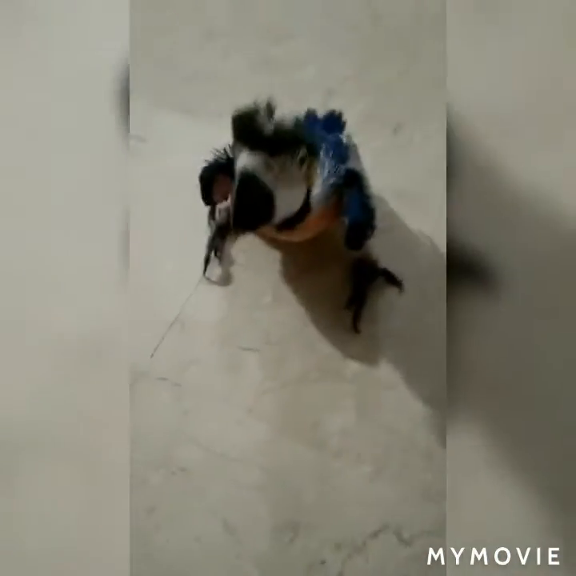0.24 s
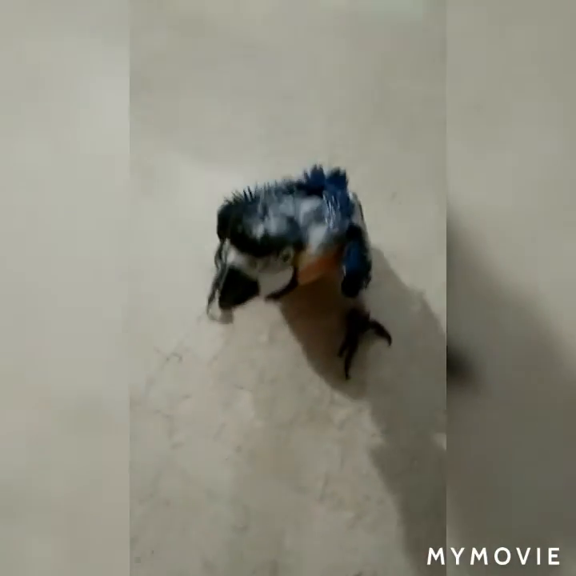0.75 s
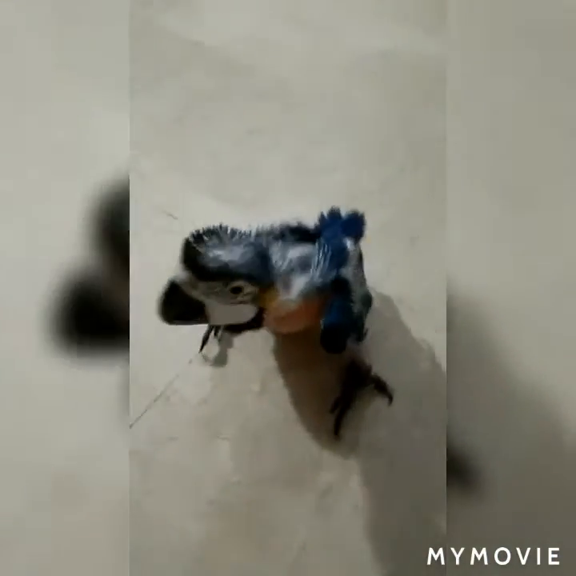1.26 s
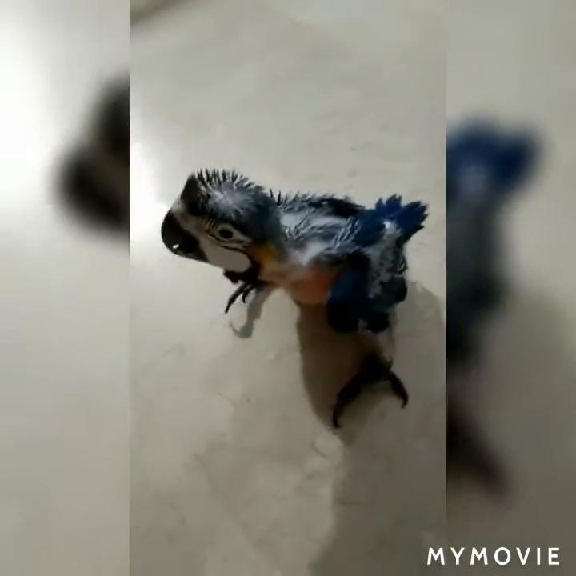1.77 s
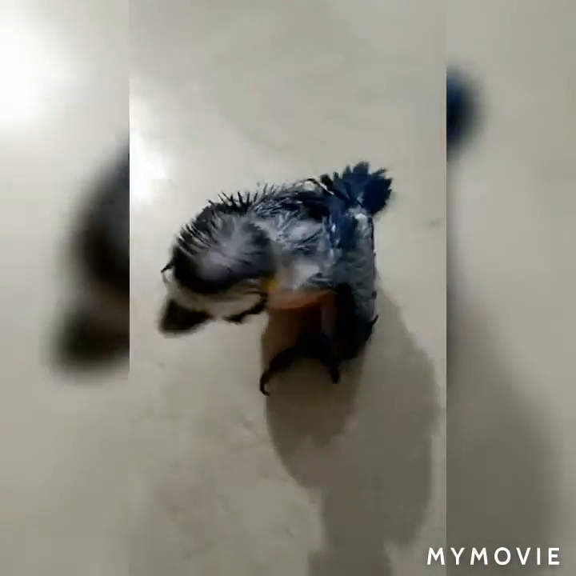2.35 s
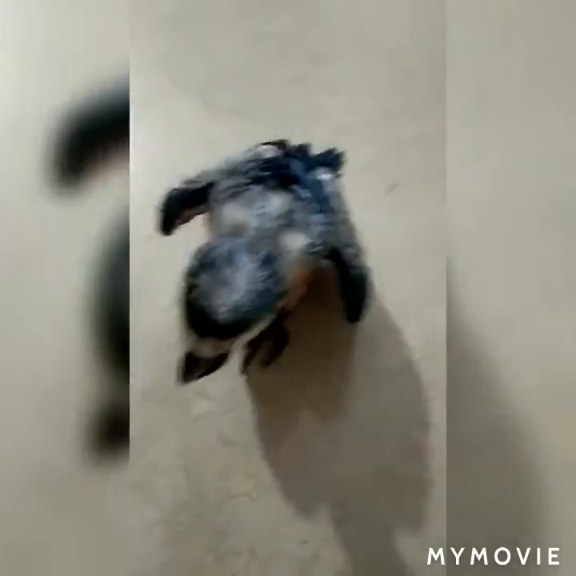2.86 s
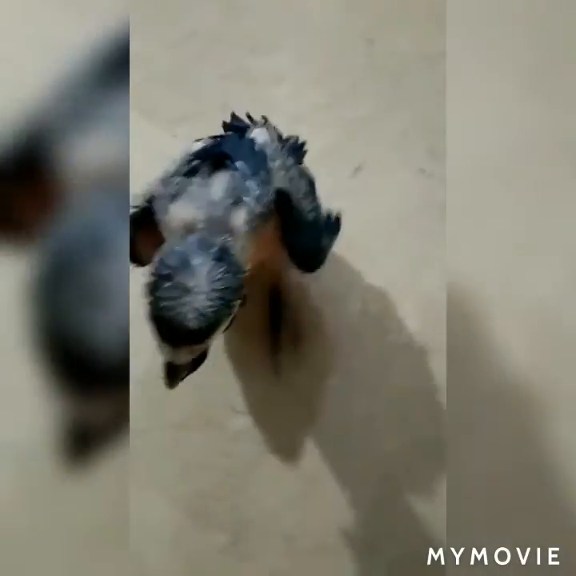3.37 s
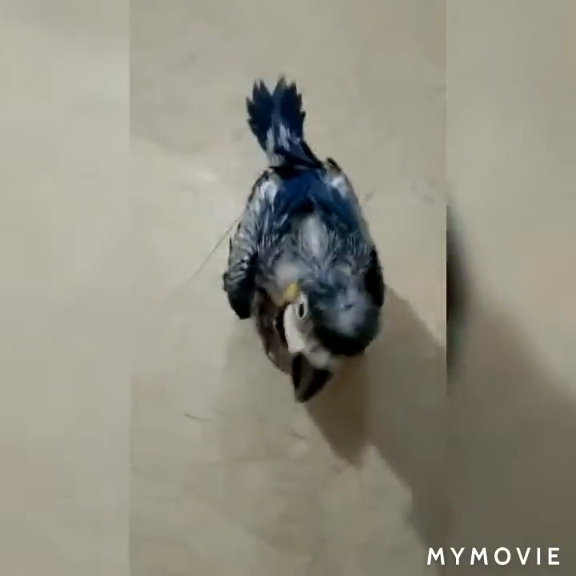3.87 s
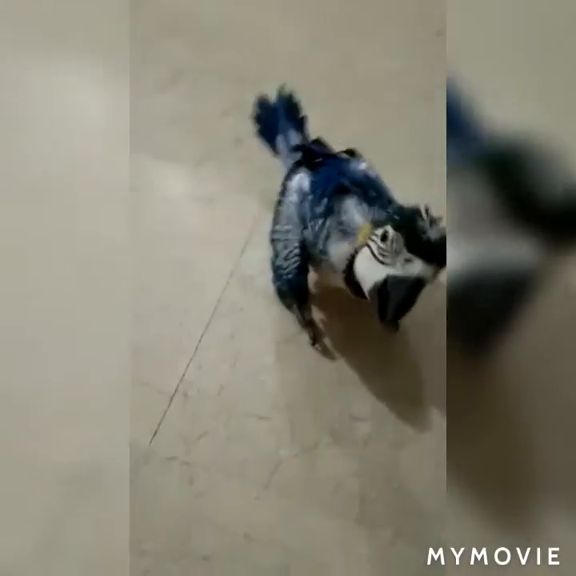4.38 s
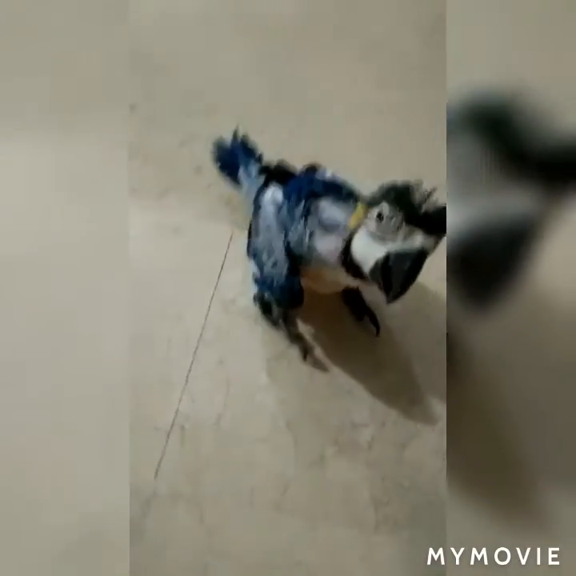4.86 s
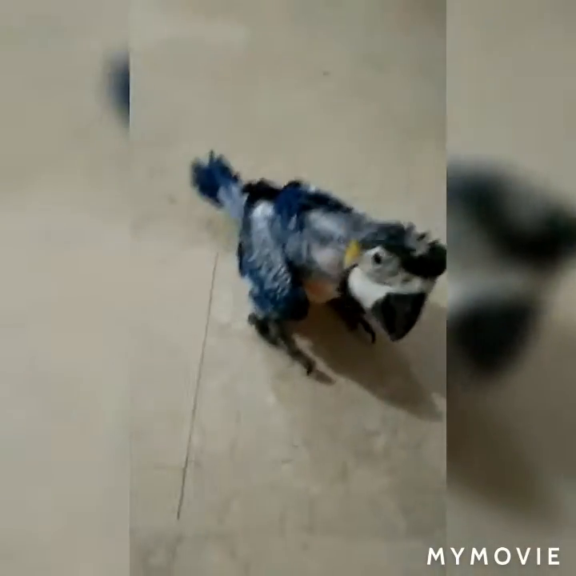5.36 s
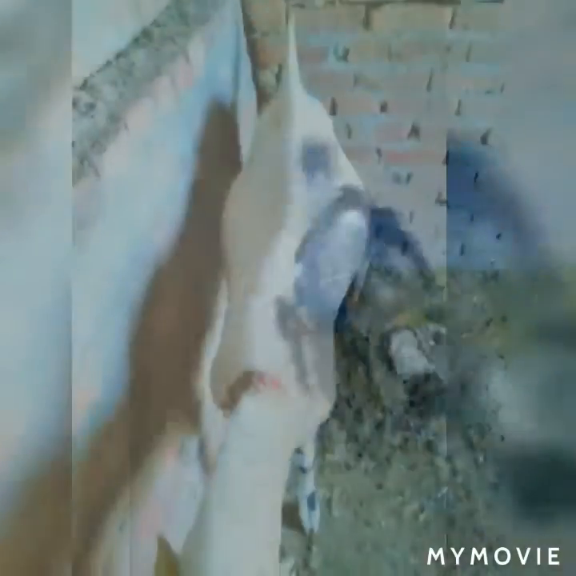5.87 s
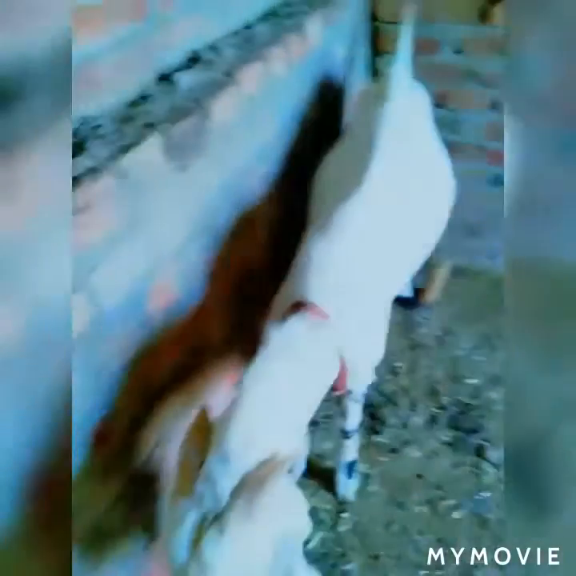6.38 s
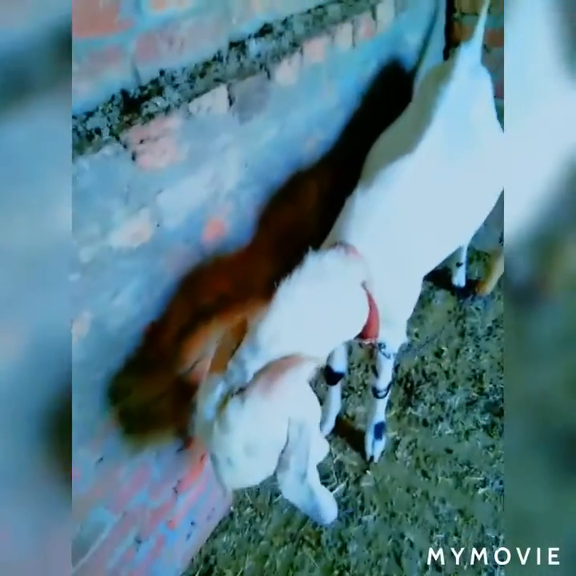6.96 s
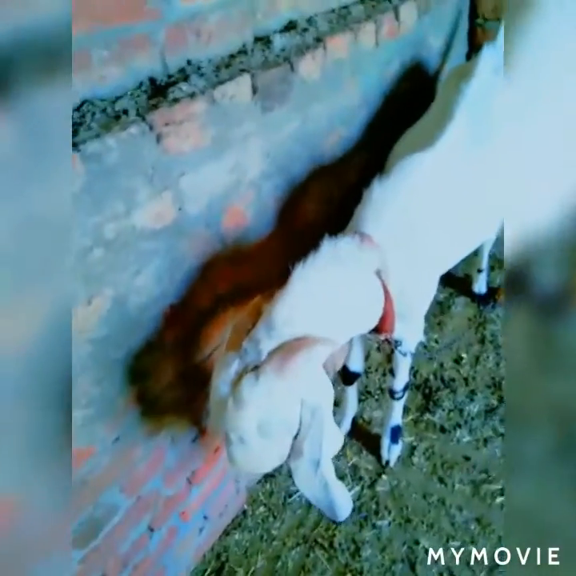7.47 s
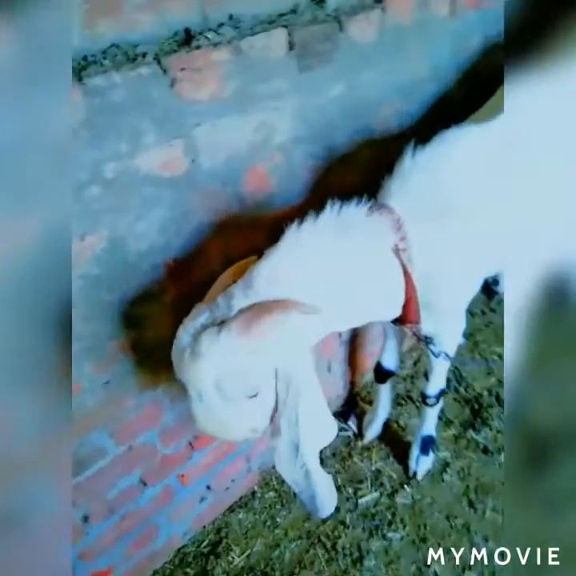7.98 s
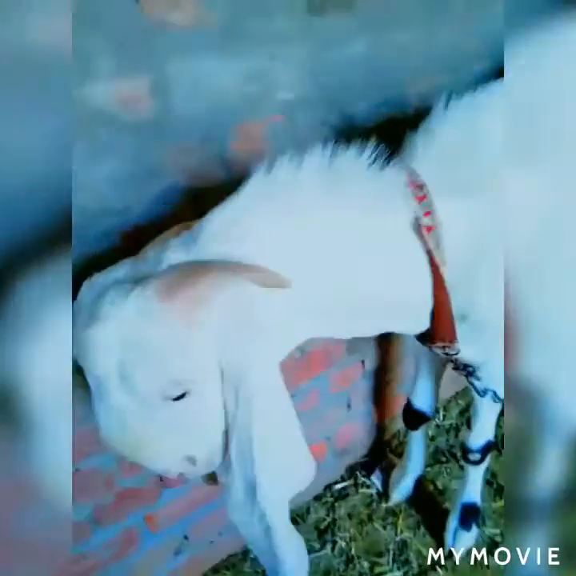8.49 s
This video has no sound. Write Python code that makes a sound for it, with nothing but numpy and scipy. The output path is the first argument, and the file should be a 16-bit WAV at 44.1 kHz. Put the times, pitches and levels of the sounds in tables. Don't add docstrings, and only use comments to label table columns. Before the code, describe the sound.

Mono phone sound in two parts. First, hard reverberant room: young parrots squawk in quick bursts, sliding whistles over low throaty grunts, with breathy hoarse moans and scattered sharp claw clicks, growing densest and loudest near the end. An abrupt tiny gap, then outdoors between walls: faint thin chirping, scratchy far bird calls, a few light straw ticks, and a soft distant traffic rumble.

```python
import sys
import numpy as np
from scipy import signal
from scipy.fft import rfft, irfft, next_fast_len
from scipy.io import wavfile
from scipy.ndimage import uniform_filter1d, minimum_filter1d

SR = 44100
rng = np.random.default_rng(int(sys.argv[2]) if len(sys.argv) > 2 else 0)


def digitize_waveform(pressure):
    field = np.atleast_2d(pressure).T
    bounded = np.clip(field, -1, 1)
    quanta = np.round(bounded * 32767).astype(np.int16)
    wavfile.write(sys.argv[1], SR, quanta)


def makeup_ratio(level_db):
    decades = np.asarray(level_db, float) / 20
    return 10 ** decades


N = 384993

ROOM_END, YARD_START = 5.575, 5.629

# t/s, level/dB
MURMUR_LEVEL = [(0, -55), (1.35, -62.5), (1.65, -67.5), (2.1, -58.5), (3.0, -60), (3.55, -57), (4.1, -50),
                (4.6, -61), (5.2, -56.5), (5.57, -60.5)]
# f/Hz, level/dB
MURMUR_TONE = [(25, -26.5), (60, -16), (120, -3.5), (1000, -14.5), (5500, -14), (7300, -20), (9000, -35),
               (15500, -51)]
# f/Hz, level/dB
FAN_HUM = [(361, -58), (120, -70)]
# f/Hz, t60/s
ROOM_DECAY = [(300, 0.36), (1200, 1.19), (2500, 1.25), (5000, 1.02), (8000, 0.62), (14000, 0.34)]
# f/Hz, level/dB
TILE_LOSS = [(1200, -1.35), (2500, -1.5), (4000, -1.5), (5500, -1), (10000, 1)]

# t/s, level/dB
TRAFFIC_LEVEL = [(5.63, -69), (5.8, -67), (5.97, -62), (6.2, -65.5), (7.0, -61.5), (8.73, -60.5)]
# f/Hz, level/dB
TRAFFIC_TONE = [(25, -39.5), (60, -4.5), (115, 2), (200, -9.5), (800, -17), (7000, -20), (8600, -39.5),
                (14000, -53)]
# f/Hz, t60/s
YARD_DECAY = [(1000, .4), (4000, 0.25), (9000, 0.087)]
# start t/s, end t/s, first f/Hz, last f/Hz, level/dB
ROUGH_SPARROWS = [(5.795, 6.001, 3470, 3520, -63), (6.053, 6.196, 3920, 3290, -63),
                  (6.064, 6.124, 3290, 3150, -61), (6.118, 6.255, 2740, 2630, -71),
                  (6.265, 6.327, 3920, 3880, -57), (5.847, 5.886, 3420, 3410, -49),
                  (6.276, 6.326, 3010, 2980, -68), (6.072, 6.135, 6500, 6100, -65),
                  (6.339, 6.392, 4560, 4460, -51.5), (6.454, 6.544, 3570, 3110, -57.5),
                  (6.592, 6.707, 3710, 3390, -60.5), (6.594, 6.652, 2780, 2780, -64),
                  (6.689, 6.764, 2560, 2440, -64), (6.794, 6.88, 3240, 2720, -63),
                  (6.896, 7.008, 3620, 3430, -59), (7.01, 7.096, 4330, 3730, -57.5),
                  (7.047, 7.096, 3180, 3070, -55), (7.179, 7.328, 3430, 3440, -57.5),
                  (7.26, 7.439, 2780, 3230, -59), (7.679, 7.765, 3380, 3320, -52.5),
                  (8.056, 8.09, 3500, 3350, -57), (8.12, 8.288, 3270, 3180, -61),
                  (8.479, 8.6, 2670, 2595, -65.5), (6.37, 6.432, 1470, 1300, -64)]
# start t/s, end t/s, f/Hz, tone level/dB, octave level/dB
CLEAR_SPARROWS = [(5.627, 5.821, 2730, -73, -68), (5.86, 5.961, 2820, -87, -57.5),
                  (6.144, 6.308, 2900, -71.5, -63.5), (6.305, 6.44, 2860, -76, -55),
                  (6.79, 6.87, 2870, -75, -54), (6.892, 7.004, 2775, -65, -56.5),
                  (7.125, 7.204, 2777, -81, -50), (7.397, 7.664, 2720, -65, -59),
                  (7.641, 7.71, 2825, -81, -52), (7.823, 8.05, 2770, -64.5, -61),
                  (8.073, 8.124, 2863, -52, -50), (8.079, 8.211, 2864, -77, -54.5),
                  (8.565, 8.724, 2825, -67.5, -55.5)]
# start t/s, end t/s, level/dB, treble tilt/dB
RASPS = [(5.831, 5.91, -61.5, 4.5), (5.96, 6.017, -62.5, 11), (6.327, 6.46, -62, 3.5),
         (6.47, 6.593, -67, -2.5), (6.771, 6.893, -57.5, 0), (6.939, 7.085, -62.5, 2),
         (7.18, 7.45, -69.5, -5), (7.394, 7.478, -67, 5.5), (7.47, 7.66, -70, 7), (7.94, 8.134, -68.5, 4),
         (8.133, 8.296, -73, -5.5), (6.048, 6.3, -74.5, -4.5), (6.592, 6.739, -69.5, -5),
         (7.661, 7.78, -59, 1.5), (7.819, 7.935, -63.5, -1.5), (8.02, 8.079, -58.5, 5),
         (8.47, 8.537, -71, 1), (8.53, 8.724, -68, 4.5)]
# f/Hz, level/dB
RASP_LOW_TONE = [(1800, -27), (2600, 2.5), (3400, 3), (4500, -1.5), (5200, -28)]
# f/Hz, level/dB
RASP_HIGH_TONE = [(4200, -22), (5000, -2), (6000, -3), (7300, -14), (8300, -19)]

# t/s, claw level/dB, knock level/dB, thud level/dB
STRAW_TICKS = [(5.7844, -58.5, -59, -61), (7.2664, -58, -48, -59), (7.2878, -48, -46, -56),
               (7.3544, -59, -41.5, -46), (7.6226, -47, -60, -75), (8.4736, -58, -50, -52)]
# t/s, claw level/dB, knock level/dB, thud level/dB
FLOOR_TICKS = [(0.5546, -18.5, -19, -31.5), (0.5677, -31.5, -9.5, -30), (0.7829, -25.5, -35, -34.5),
               (0.7943, -21, -34.5, -26.5), (2.885, -42, -37, -31.5), (0.9525, -37, -49, -43),
               (1.3021, -33, -45, -47), (2.6028, -27, -18, -27), (3.2571, -22.5, -20.5, -39),
               (3.4518, -24, -28, -51), (3.4575, -22.5, -30.5, -49.5), (3.5421, -32.5, -27, -48.5),
               (3.5495, -37, -42.5, -37), (3.6777, -24, -29, -42.5), (3.6812, -19.5, -18.5, -38),
               (3.6953, -28, -37, -62), (3.7696, -20, -24.5, -30.5), (3.8752, -15.5, -29.5, -26),
               (3.9904, -10.5, -10.5, -19.5), (4.2417, -28, -28, -71), (4.4244, -34.5, -26, -38.5),
               (4.4611, -37, -26.5, -39.5), (4.521, -22.5, -37, -55.5), (4.8684, -35, -34, -68.5),
               (4.9781, -34, -47, -65), (5.1339, -33.5, -28, -37), (5.3654, -19, -33, -38.5)]
# f/Hz, width/Hz, level/dB
CLAW_MODES = [(6100, 660, 13), (3600, 200, 4)]
# f/Hz, width/Hz, level/dB
KNOCK_MODES = [(2500, 270, 6), (1300, 730, -1.5)]
# f/Hz, width/Hz, level/dB
THUD_MODES = [(426, 120, 3.5), (242, 300, -9)]
# delay t/s, level/dB
BLOW_RETURNS = [(.0007, 4.76), (.0025, -4.5), (.0046, -9.5)]

# f/Hz, level/dB
MIC_TREBLE = [(7400, 0.5), (8400, -16), (10000, -22), (12500, -34.5), (14500, -29), (16000, -35)]
# f/Hz, level/dB
BREATH_TONE = [(250, -25), (900, -20), (1300, -2.5), (2400, 2.5), (3400, -3.5), (5200, -5.5), (7000, -13),
               (16000, 0)]
# t/s, level/dB
HISS_LEVEL = [(1.64, -81.5), (1.72, -56.5), (1.84, -56.5), (1.92, -73.5), (2.05, -95)]
# f/Hz, level/dB
HISS_COLOUR = [(7500, -40), (8500, -3), (11500, -7.5), (12300, -23.5), (13200, -0.5), (14200, 0),
               (15600, -6.5)]

# start t/s, end t/s, f/Hz, peak level/dB, air above the mic's edge level/dB
GRUNT_NOTES = [(0.055, 0.206, 611.1, -25.5, -5.5), (1.307, 1.371, 633, -23.5, -9),
               (2.629, 2.735, 610, -22, -2), (5.134, 5.24, 605.3, -25.5, 7.5)]
# f/Hz, level/dB
GRUNT_THROAT = [(500, -16.5), (1250, -4.5), (1800, -6), (2450, 3.5), (3200, -7.5), (4800, -4.5),
                (7300, -12), (16000, -21.5)]
# start t/s, end t/s, f/Hz, peak level/dB, air above the mic's edge level/dB
CAW_NOTES = [(0.191, 0.409, 726, -33.5, 7), (1.354, 1.47, 745, -29, -5.5), (2.714, 2.915, 751, -29, -3)]
# f/Hz, level/dB
CAW_FORMANTS = [(700, -14.5), (1500, -7), (2200, -1.5), (2980, 5), (3700, -4), (5000, 2.5), (7400, -7),
                (16000, -22.5)]
# t/s, f/Hz, level/dB
DRONE_PATHS = [
    [(1.64, 1113, -39.5), (1.7, 1112, -32.5), (1.75, 1000, -27.5), (1.78, 868, -32), (1.86, 848, -34),
     (1.89, 861, -37.5), (2.02, 867, -38.5)],
    [(2.0, 1255, -34), (2.3, 1243, -41.5), (2.56, 1180, -36)],
]
# f/Hz, level/dB
DRONE_FORMANTS = [(800, -9), (1200, -8.5), (1750, 5), (2300, 10.5), (3300, -4.5), (4400, -2.5), (6000, 1),
                  (7400, -12)]
DRONE_SCATTER = [2.6, 6]
DRONE_AIR_DB = [-2.5, -9]

# start t/s, end t/s, first f/Hz, last f/Hz, peak level/dB
FALLS = [(.39, .425, 2110, 1850, -12.5), (.425, .497, 2200, 1250, -24.5), (5.141, 5.19, 3260, 2900, -19),
         (1.575, 1.645, 2220, 1800, -20), (1.697, 1.775, 1880, 1470, -25.5),
         (2.92, 2.99, 2247, 1950, -12.5), (3.185, 3.225, 2550, 2300, -33), (4.05, 4.11, 2300, 1700, -17),
         (4.04, 4.15, 2622, 2667, -22.5), (5.257, 5.298, 2790, 2540, -18.5)]
SURGES = [(.19, .335, 2872, 2479, -23), (.345, .4, 2053, 2035, -13), (4.095, 4.168, 1845, 1704, -20),
          (5.18, 5.25, 2926, 2714, -16.5)]
REEDS = [(.325, .395, 2197, 1976, -9.5), (1.98, 2.24, 2222, 2034, -27.5)]
SQUEAKS = [(3.62, 3.67, 5640, 6100, -43.5)]
PIPES = [(1.42, 1.56, 3055, 2612, -20.5), (1.45, 1.62, 2802, 2277, -12)]
HELD = [(2.03, 2.2, 1909, 1813, -35.5), (2.28, 2.5, 1937, 1920, -29), (2.4, 2.5, 2010, 2043, -28),
        (3.015, 3.3, 2039, 1833, -18.5)]
GROANS = [(3.8, 4.0, 1826, 1333, -26)]
# notes, partial 1-4 level/dB, resting level/dB, pitch bend (under 1 drops early)
KINDS = [(FALLS, (0.5, -26, -28.5, -31), -27, 0.9), (SURGES, (-3, -15.5, -8, -15.5), -24, 0.77),
         (PIPES, (-10.5, -1, -47, -58.5), -32.5, 1), (HELD, (2, -8, -9.5, -36.5), -39, 0.41),
         (REEDS, (-3, -14, -0.5, -22.5), -32, 0.45), (GROANS, (-8.5, 1, -6, -2), -38.5, 0.8),
         (SQUEAKS, (0.1, -33), -40.5, 1.5)]
KIND_SCATTER = [.6, .7, .55, 1.7, .9, 5.4, 7]
KIND_SWELL = [False, True, False, False, False, True, True]
# t/s, f/Hz, level/dB
MOAN_PATH = [(4.24, 1620, -37), (4.29, 1795, -35.5), (4.34, 1718, -29), (4.399, 1525, -28.5),
             (4.47, 1401, -31), (4.6, 1249, -36)]
MOAN_PARTIALS = (-4.5, 4, -3.5, -7)
MOAN_SCATTER = 5.0
# t/s, f/Hz, level/dB, beak opening level/dB (frees the overtones)
SWOOP_PATHS = [
    [(.205, 3220, -28, 0), (.235, 3034, -17, -8), (.28, 2782, -20, -8), (.315, 2577, -17, -5.5),
     (.33, 2340, -18.5, -10.5)],
    [(2.8, 3100, -33, -8), (2.84, 2960, -23.5, -8), (2.88, 2717, -19, -1), (2.92, 2476, -16, -3),
     (3.01, 2242, -31.5, -4)],
    [(3.72, 1760, -33, -23), (3.75, 1848, -27, -0.9), (3.85, 1848, -24.5, -2), (3.92, 1856, -39, -0.8)],
    [(3.92, 2397, -39.5, 2.2), (3.96, 2580, -23.5, 0.8), (3.995, 2640, -21.5, -1), (4.015, 2536, -18, -6),
     (4.04, 2252, -11, -13.5)],
    [(4.106, 2304, -24, -7), (4.12, 2104, -25.5, 2.5), (4.14, 2008, -22, 1.2), (4.157, 1824, -25, -8),
     (4.18, 1520, -28, 2), (4.203, 1314, -29, -2)],
    [(5.226, 3217, -16.5, 3), (5.249, 2840, -10.5, -8.5), (5.257, 2592, -9.5, -18.5),
     (5.268, 2384, -11.5, 2.7), (5.3, 2054, -18.5, 1.5), (5.337, 1776, -25.5, -2.5), (5.36, 1586, -20, -25),
     (5.374, 1337, -25.5, 11.5), (5.445, 886, -36.5, -20)],
    [(5.366, 2822, -16.5, -20), (5.381, 2417, -11.5, -17.5), (5.41, 2290, -15.5, -2), (5.43, 2068, -21, 3),
     (5.447, 1787, -19, 2), (5.457, 1740, -26.5, -7.5), (5.492, 1340, -24.5, -13)],
]
SWOOP_PARTIALS = [(-3.5, 0.5, -37.5, -39), (-1.5, -11, -41, -59), (-3, -6.5, -8, -33.5), (1.5, 5, -21, -52),
                  (7.5, -22.5, -10.5, -17), (-5.5, -6.5, -20.5, -10), (-7, -6.5, -13.5, -17)]
SWOOP_SCATTER = [.5, .5, 2.4, .4, .4, .6, .7]
# f/Hz, level/dB
BEAK_TONE = [(3200, -8), (4000, 7), (4900, -8), (5500, 3), (6400, 2.5), (8000, -1.5)]


def unit(x):
    return x / np.sqrt(np.mean(x ** 2) + 1e-20)


def along(points, hz):
    f, v = np.transpose(points)
    return np.interp(np.log(hz + 1), np.log(f + 1), v)


def curve(rows):
    return np.interp(np.arange(N) / SR, *np.transpose(rows))


def wobble(rate, size):
    knots = rng.standard_normal(int(size * 600 / SR) + 4)
    place = np.arange(size) * min(rate, 600) / SR
    return np.interp(place, np.arange(len(knots)), knots) * 1.2


def filtered(x, response):
    m = next_fast_len(N + 8192)
    return irfft(rfft(x, m) * response(np.fft.rfftfreq(m, 1 / SR)), m)[:N]


def resonant(x, modes):
    def response(f):
        total = 0
        for k, (centre, width, db) in enumerate(modes):
            band = 1j * f * width
            total = total + (-1) ** k * makeup_ratio(db) * band / (centre * centre - f * f + band)
        return total
    return filtered(x, response)


def rush(spectrum, patchy_db):
    z = signal.stft(rng.standard_normal(N), nperseg=512)[2]
    field = uniform_filter1d(rng.standard_normal(z.shape), 6, 0)
    field = uniform_filter1d(field, 12, 1)
    noise = signal.istft(z * makeup_ratio(patchy_db * unit(field)), nperseg=512)[1][:N]
    return unit(filtered(noise, lambda f: makeup_ratio(along(spectrum, f))))


def echo(x, decays):
    hz, t, z = signal.stft(rng.standard_normal(int(1.5 * SR)), SR, nperseg=256)
    fall = makeup_ratio(-60 * t / along(decays, hz)[:, None])
    tail = signal.istft(z * fall, SR, nperseg=256)[1]
    delayed = np.pad(x, (200, 0))
    return signal.fftconvolve(delayed, tail / np.linalg.norm(tail))[:N]


def add_note(out, rows, scatter, partial_db, count, flutter_db, drift_db, fade):
    s, hz, db, *beak = np.transpose(rows)
    t = np.arange(s[0], s[-1], 1 / SR)
    pitch = np.interp(t, s, hz)
    unsteady = pitch * (1 + scatter / 100 * wobble(500, len(t)))
    phase = 2 * np.pi * np.cumsum(unsteady) / SR
    open_db = np.interp(t, s, beak[0]) if beak else 0
    tone = np.zeros(len(t))
    for k in range(1, count + 1):
        partial = k * pitch
        if partial.min() >= 15600:
            continue
        level = partial_db(k, partial) + along(MIC_TREBLE, partial)
        level = level + flutter_db * wobble(140, len(t))
        if k > 1:
            level = level + open_db + drift_db * wobble(20.7, len(t))
        tone += makeup_ratio(level) * (partial < 15600) * np.sin(k * phase + k * k)
    edge = np.clip(np.minimum(t - s[0], s[-1] - t) / fade, 0, 1)
    out[round(s[0] * SR):][:len(t)] += makeup_ratio(np.interp(t, s, db)) * edge * tone


def traffic():
    return makeup_ratio(curve(TRAFFIC_LEVEL) + 2) * rush(TRAFFIC_TONE, patchy_db=1.9)


def murmur():
    return makeup_ratio(curve(MURMUR_LEVEL) + 10) * rush(MURMUR_TONE, patchy_db=2.1)


def fan_hum():
    t = np.arange(N) / SR
    hum = np.zeros(N)
    for hz, db in FAN_HUM:
        level = makeup_ratio(db + 1.2 * wobble(2.3, N))
        hum += level * np.sin(2 * np.pi * hz * t + 1.3 * wobble(8.5, N))
    return hum


def sparrows():
    out = np.zeros(N)
    clear = [(start, end, hz * .985, hz * 1.01, 2.1, *db) for start, end, hz, *db in CLEAR_SPARROWS]
    rough = [(*note, 3.3, db, db - 28) for *note, db in ROUGH_SPARROWS]
    for start, end, first, last, scatter, *db in clear + rough:
        rows = [(start, first, .1), (end, last, -2.5)]
        add_note(out, rows, scatter, lambda k, hz: db[k - 1],
                 count=2, flutter_db=3.5, drift_db=2.0, fade=0.019)
    return out


def rasping_calls():
    t = np.arange(N) / SR
    effort = np.zeros((2, N))
    for start, end, db, tilt_db in RASPS:
        envelope = np.clip(np.minimum((t - start) / 0.027, (end - t) / 0.026), 0, 1)
        effort += makeup_ratio([[db - tilt_db], [db + tilt_db]]) * envelope
    low = effort[0] * rush(RASP_LOW_TONE, patchy_db=2.5)
    high = effort[1] * rush(RASP_HIGH_TONE, patchy_db=4.5)
    return makeup_ratio(3.9 * wobble(180, N)) * (low + high)


def ticks(rows):
    blows = np.zeros((3, N + 400))
    shape = makeup_ratio(-60 * np.arange(66) / SR / 0.00092)
    chance = rng.standard_normal((len(rows), 3, 66))
    for (s, *db), grits in zip(rows, chance):
        for (late, loss_db), grit in zip(BLOW_RETURNS, grits):
            force = makeup_ratio(np.array(db) + loss_db + [9, 7, 17])[:, None]
            blows[:, round((s + late) * SR):][:, :66] += force * shape * (1 + 0.3 * grit)
    claw = filtered(resonant(blows[0], CLAW_MODES), lambda hz: makeup_ratio(along(MIC_TREBLE, hz) * 0.42))
    return claw + resonant(blows[1], KNOCK_MODES) + resonant(blows[2], THUD_MODES)


def yard():
    birds = sparrows() + rasping_calls()
    birds = filtered(birds, lambda hz: 1 / (1 + (hz / 8200) ** 16))
    return makeup_ratio(0.5) * birds + makeup_ratio(-3) * echo(birds, YARD_DECAY) + ticks(STRAW_TICKS) + traffic()


def breath(calls):
    effort = np.sqrt(np.abs(uniform_filter1d(calls ** 2, 700)))
    effort = effort + makeup_ratio(-26.0 - 60 * np.arange(N) / SR / 2.0)
    air = filtered(rush(BREATH_TONE, patchy_db=5.5), lambda hz: makeup_ratio(along(MIC_TREBLE, hz)))
    return makeup_ratio(-8.0) * effort * air


def squawk_notes():
    notes = []
    for start, end, hz, db, air_db in GRUNT_NOTES:
        rows = [(start, hz * (1 - 0.028), db - 15), (end, hz, db)]
        notes.append((rows, 1.8, air_db, GRUNT_THROAT))
    for start, end, hz, db, air_db in CAW_NOTES:
        edge_hz = hz * (1 - 0.02)
        rows = [(start, edge_hz, db - 1), ((start + end) / 2, hz, db), (end, edge_hz, db - 4)]
        notes.append((rows, 1.9, air_db, CAW_FORMANTS))
    for rows, scatter, air_db in zip(DRONE_PATHS, DRONE_SCATTER, DRONE_AIR_DB):
        notes.append((rows, scatter, air_db, DRONE_FORMANTS))
    return notes


def squawks():
    out = np.zeros(N)
    for rows, scatter, air_db, throat in squawk_notes():
        add_note(out, rows, scatter, lambda k, hz: along(throat, hz) - 3 + air_db * (hz > 8000),
                 count=19, flutter_db=3.5, drift_db=3, fade=.015)
    return out


def short_whistles():
    u = np.linspace(0, 1, num=7)
    notes = []
    for (kind, partials, rest_db, bend), scatter, swells in zip(KINDS, KIND_SCATTER, KIND_SWELL):
        toward_rest = (1 - u) ** 2 if swells else u
        for start, end, first, last, peak_db in kind:
            time = start + (end - start) * u
            pitch = first + (last - first) * u ** bend
            level = peak_db + (rest_db - peak_db) * toward_rest
            notes.append((np.transpose([time, pitch, level]), partials, scatter))
    return notes


def whistles():
    out = np.zeros(N)
    swoops = list(zip(SWOOP_PATHS, SWOOP_PARTIALS, SWOOP_SCATTER))
    notes = swoops + [(MOAN_PATH, MOAN_PARTIALS, MOAN_SCATTER)] + short_whistles()
    for n, (rows, partials, scatter) in enumerate(notes):
        def partial_db(k, hz):
            if k <= len(partials):
                level = partials[k - 1]
            else:
                level = min(partials[-1], -12) - 6 * (k - len(partials))
            wide_beak = n < len(swoops) and k > 1
            return level + wide_beak * along(BEAK_TONE, hz)
        add_note(out, rows, scatter, partial_db, count=8, flutter_db=2.2, drift_db=3, fade=.006)
    return out


def tiled_room():
    calls = whistles() + squawks()
    feet = ticks(FLOOR_TICKS)
    calls = calls + breath(calls) + makeup_ratio(curve(HISS_LEVEL)) * rush(HISS_COLOUR, patchy_db=2.0)
    stirred = calls * (1 + 0.91 * wobble(330, N))
    walls = echo(makeup_ratio(-6.5) * stirred + makeup_ratio(-4.5) * feet, ROOM_DECAY)
    walls = filtered(walls, lambda hz: makeup_ratio(along(TILE_LOSS, hz)))
    return makeup_ratio(1.0) * calls + feet + walls + murmur() + fan_hum()


def scene():
    t = np.arange(N) / SR
    mix = tiled_room() * (t < ROOM_END) + yard() * (t > YARD_START)
    return np.tile(mix, (2, 1))


def band_limit(x):
    return signal.sosfilt(signal.butter(12, 16350, fs=SR, output="sos"), x)


def record(dry):
    kept = filtered(dry[0], lambda hz: (hz < 15810) / np.sqrt(1 + (48 / (hz + 1)) ** 6))
    needed = np.minimum(1, .56 / (np.abs(kept) + 1e-9))
    gain = uniform_filter1d(minimum_filter1d(needed, size=400), size=300)
    return band_limit(np.tile(kept * gain, (2, 1)))


dry = scene()
out = record(dry)
digitize_waveform(out)
```